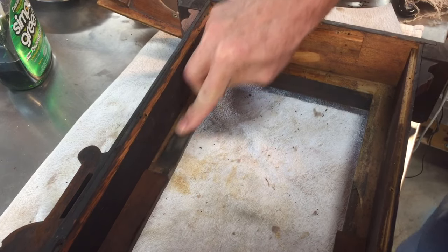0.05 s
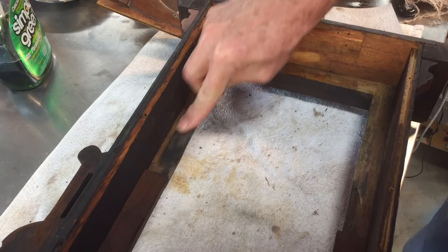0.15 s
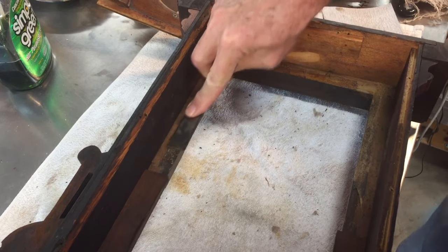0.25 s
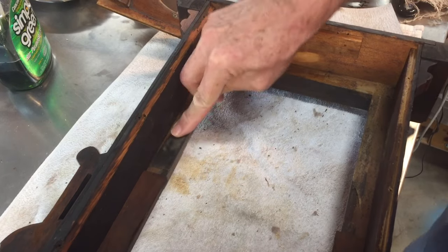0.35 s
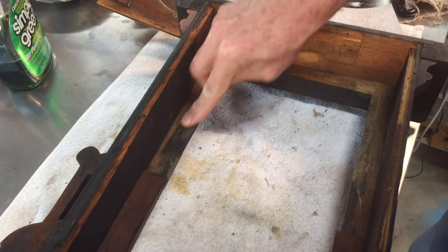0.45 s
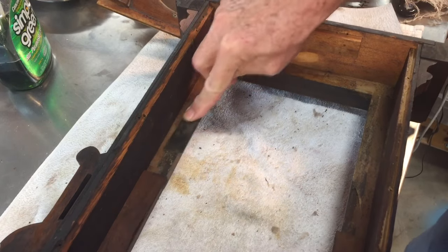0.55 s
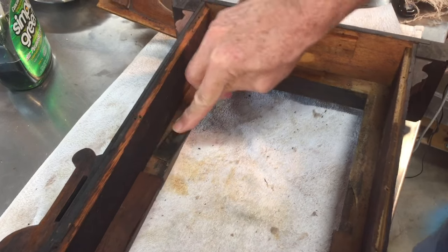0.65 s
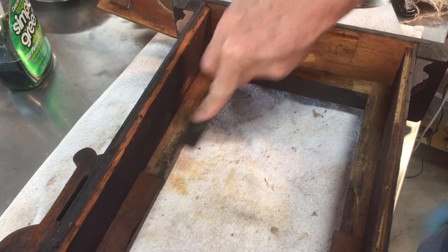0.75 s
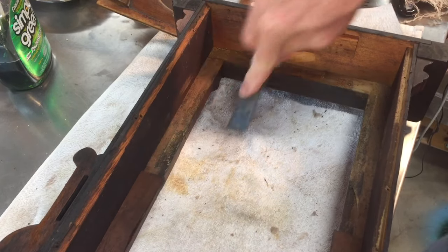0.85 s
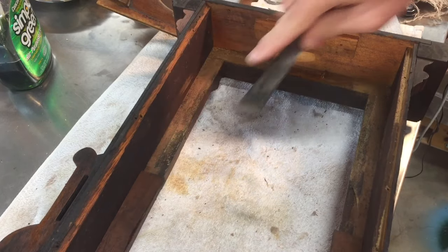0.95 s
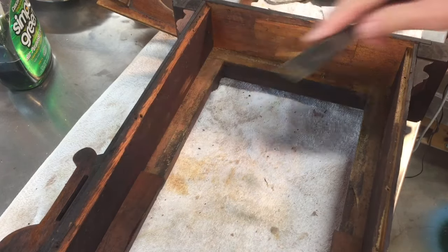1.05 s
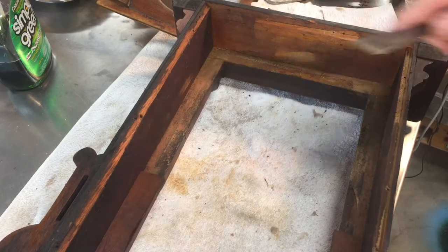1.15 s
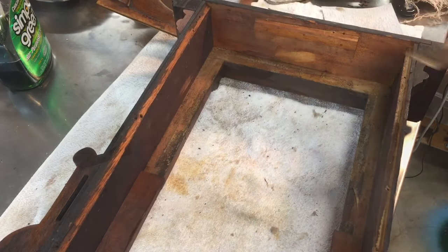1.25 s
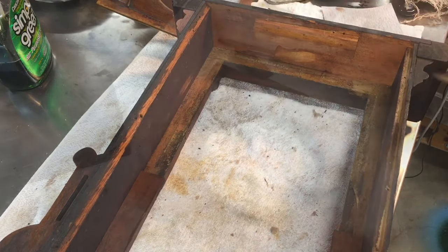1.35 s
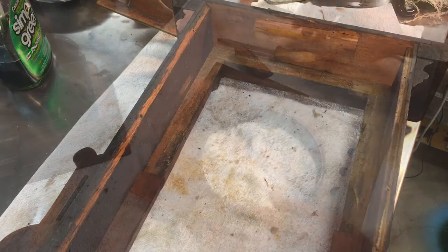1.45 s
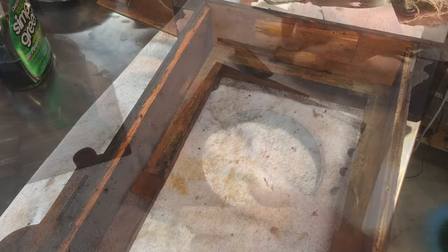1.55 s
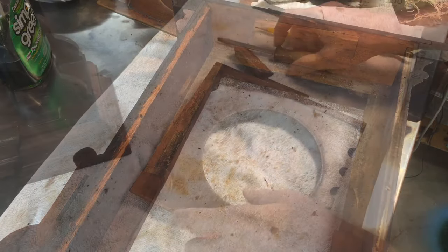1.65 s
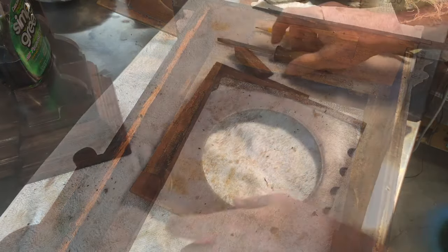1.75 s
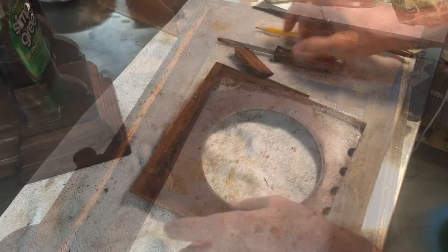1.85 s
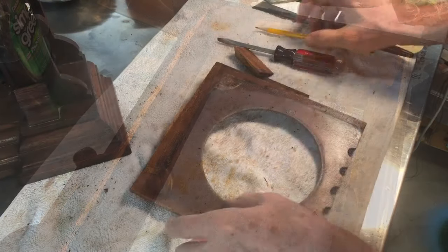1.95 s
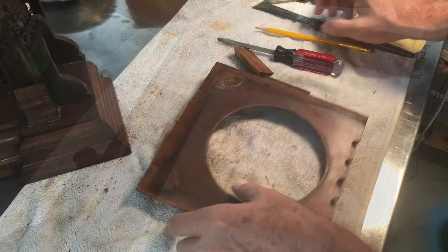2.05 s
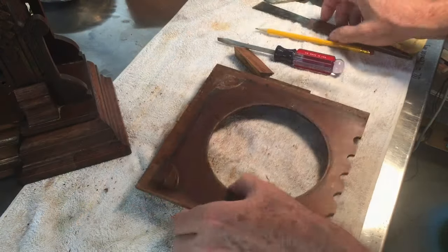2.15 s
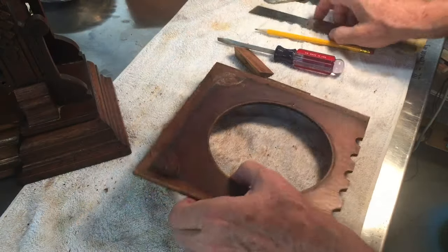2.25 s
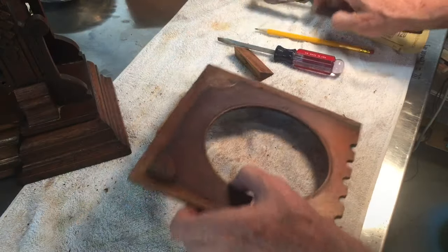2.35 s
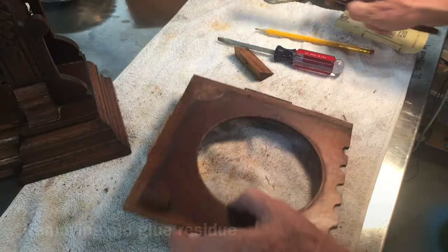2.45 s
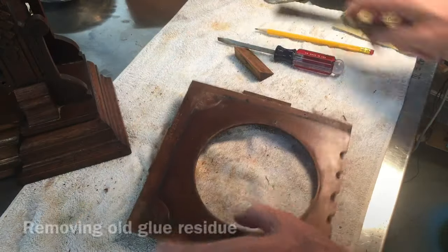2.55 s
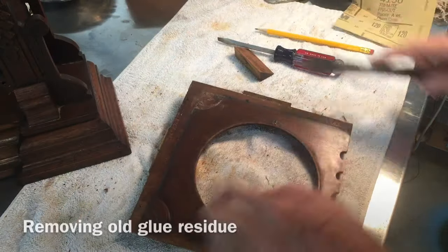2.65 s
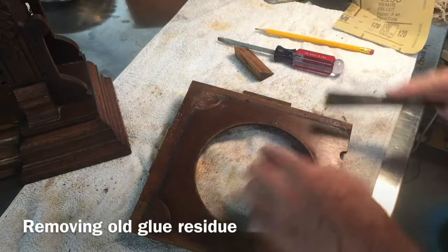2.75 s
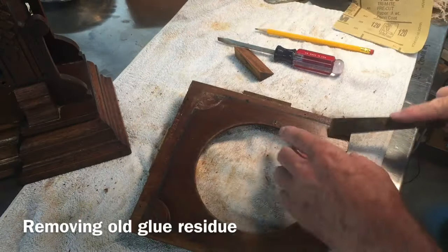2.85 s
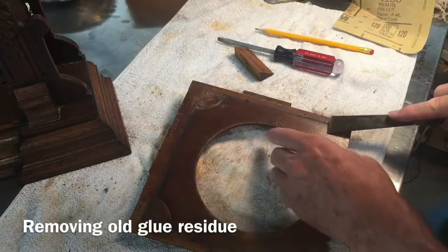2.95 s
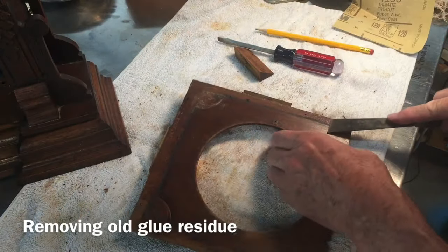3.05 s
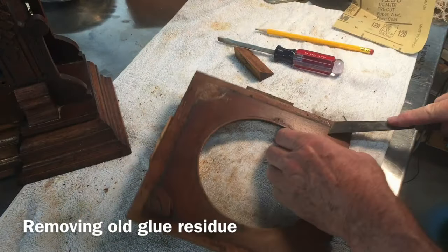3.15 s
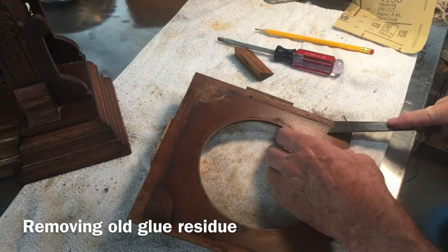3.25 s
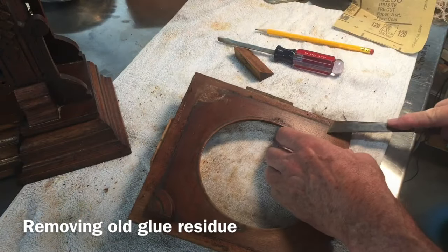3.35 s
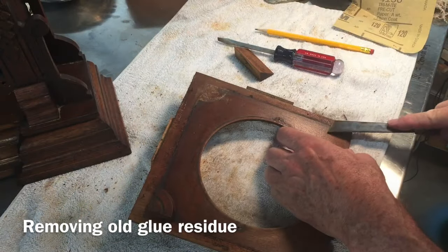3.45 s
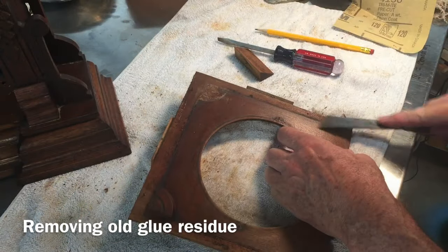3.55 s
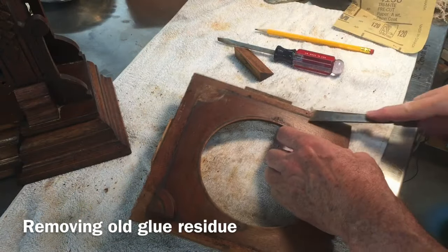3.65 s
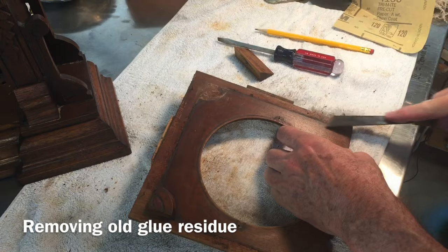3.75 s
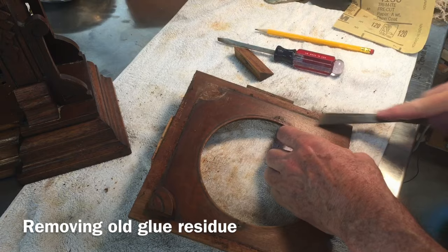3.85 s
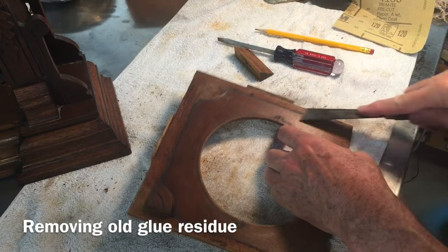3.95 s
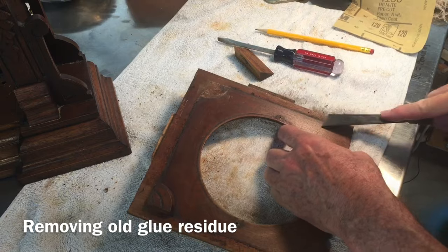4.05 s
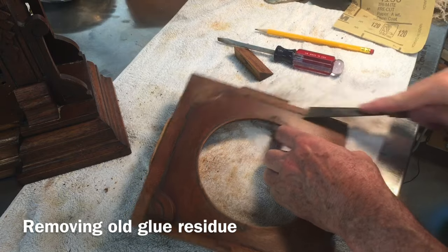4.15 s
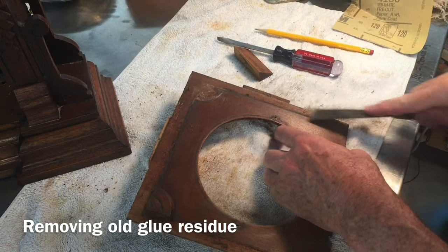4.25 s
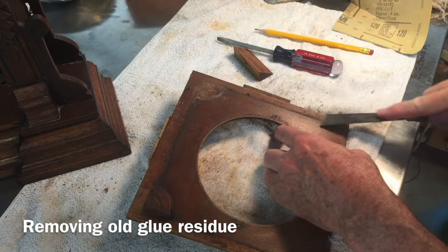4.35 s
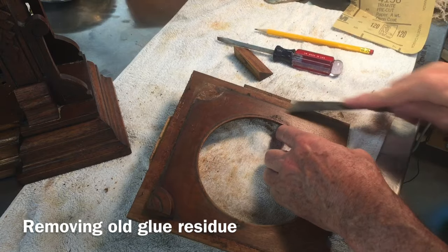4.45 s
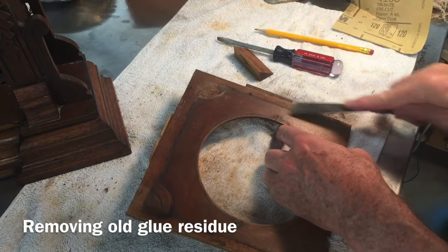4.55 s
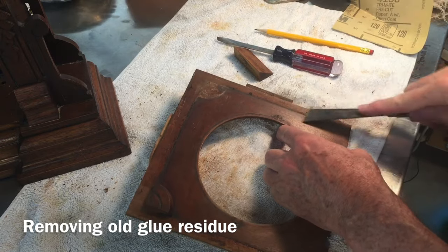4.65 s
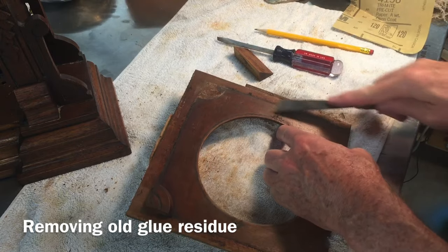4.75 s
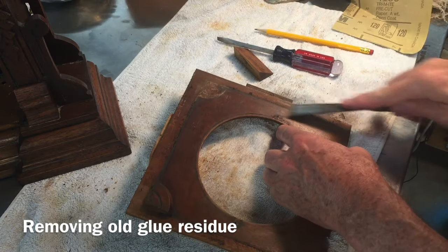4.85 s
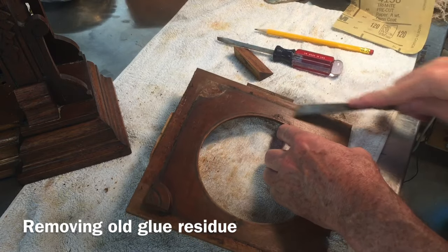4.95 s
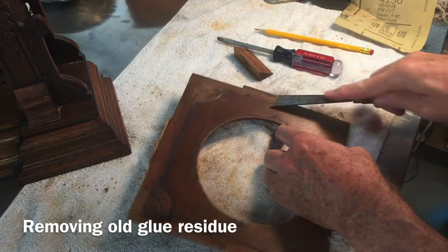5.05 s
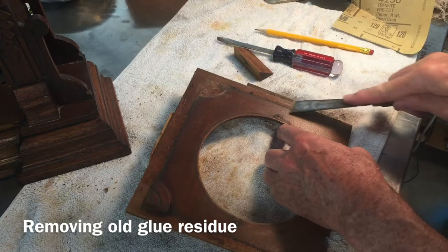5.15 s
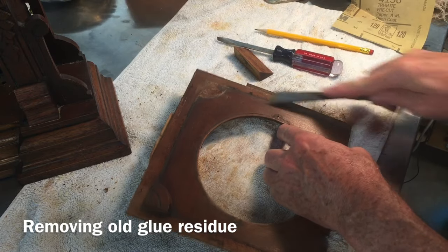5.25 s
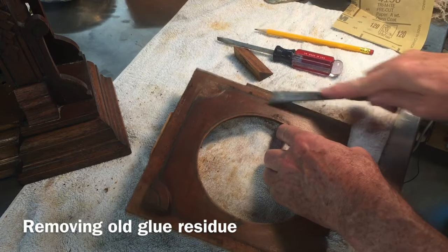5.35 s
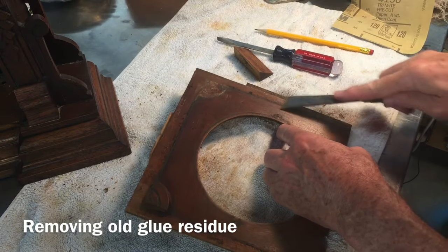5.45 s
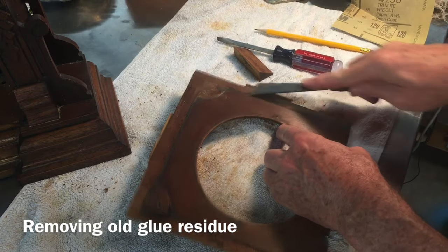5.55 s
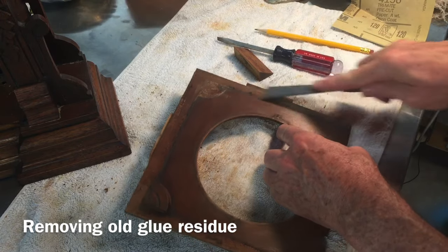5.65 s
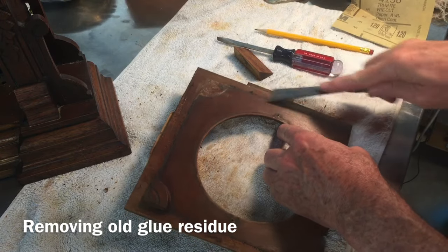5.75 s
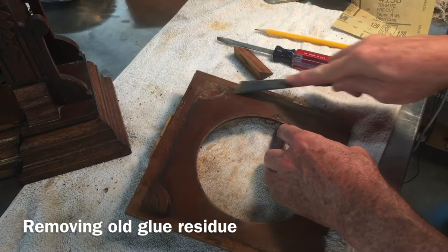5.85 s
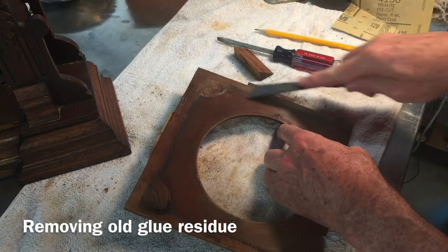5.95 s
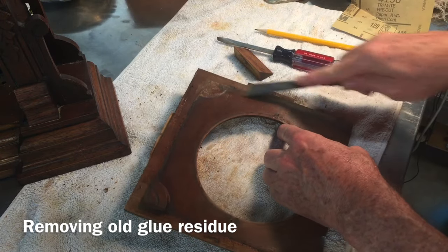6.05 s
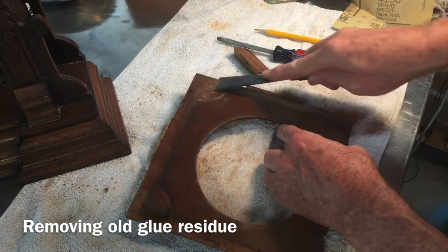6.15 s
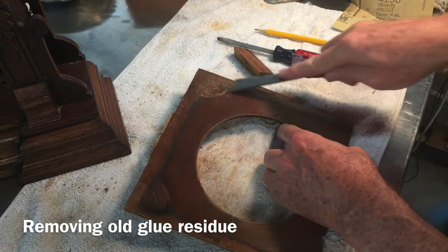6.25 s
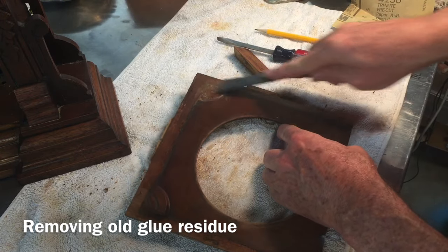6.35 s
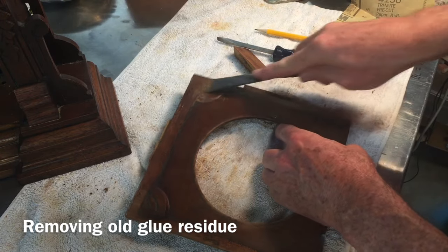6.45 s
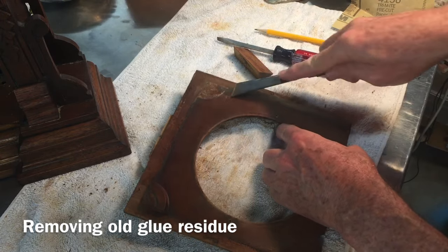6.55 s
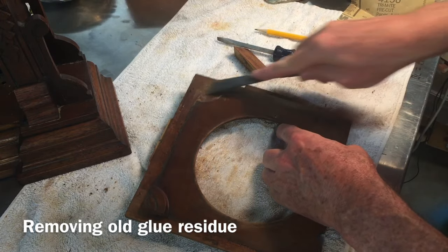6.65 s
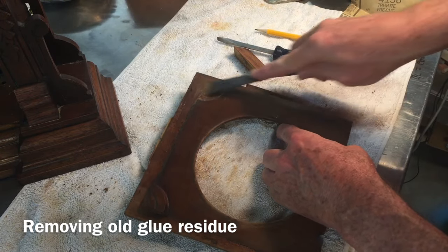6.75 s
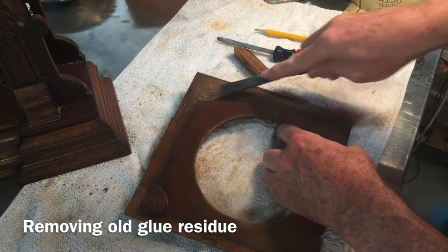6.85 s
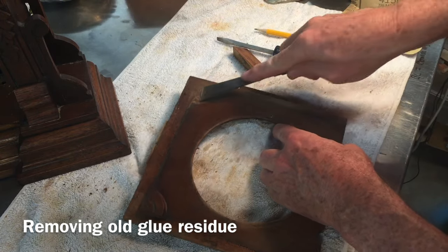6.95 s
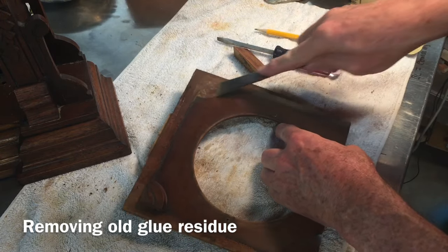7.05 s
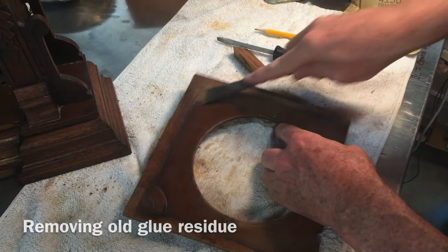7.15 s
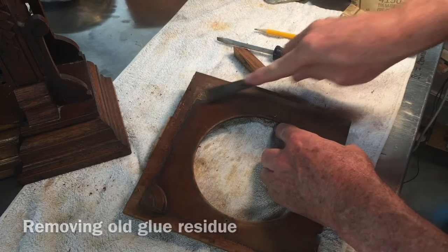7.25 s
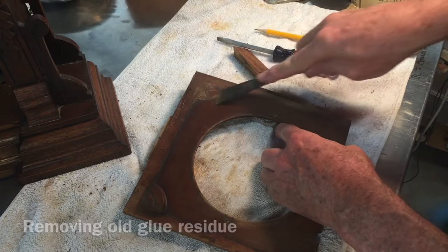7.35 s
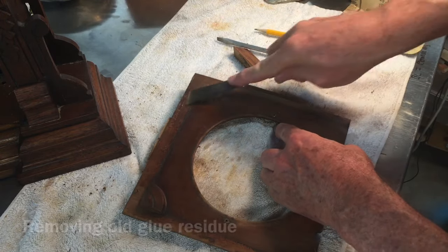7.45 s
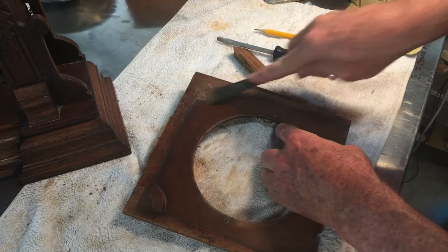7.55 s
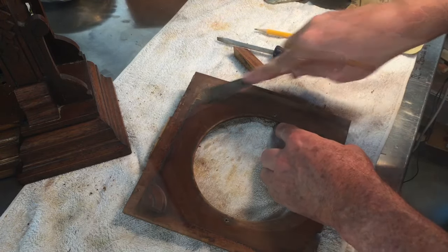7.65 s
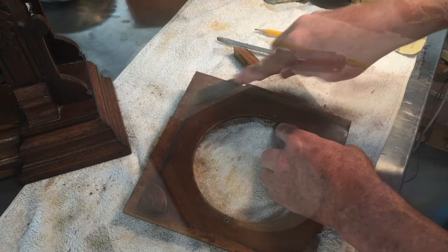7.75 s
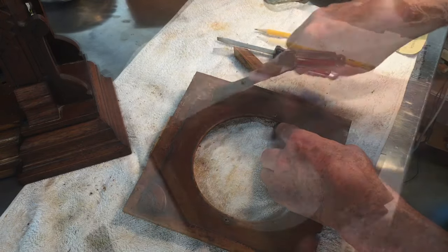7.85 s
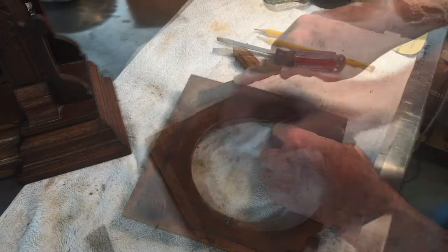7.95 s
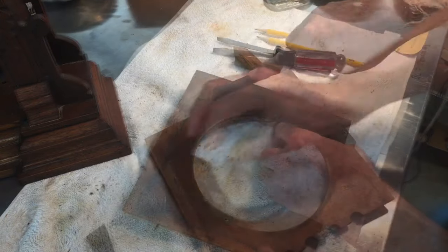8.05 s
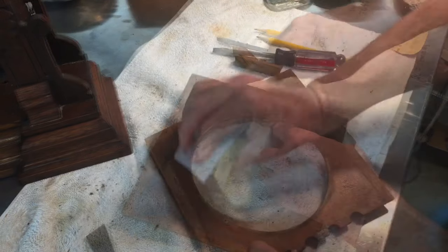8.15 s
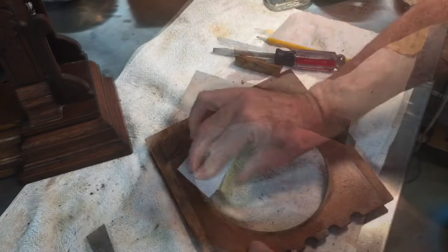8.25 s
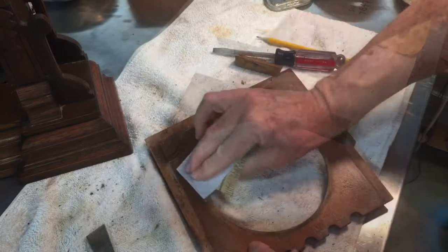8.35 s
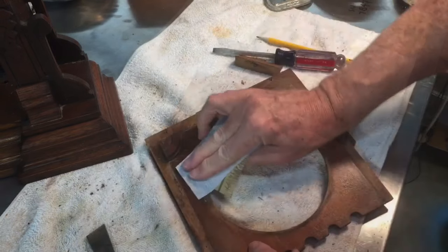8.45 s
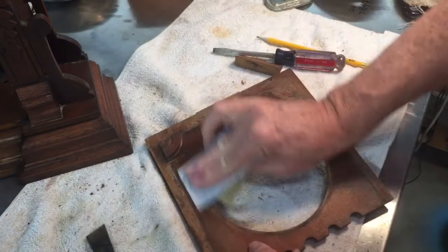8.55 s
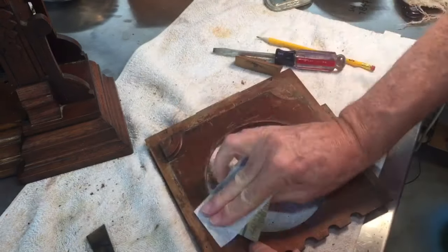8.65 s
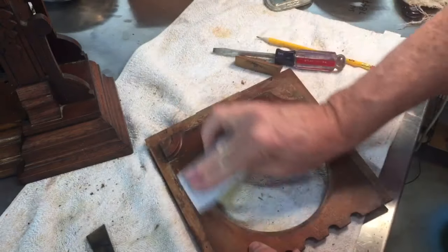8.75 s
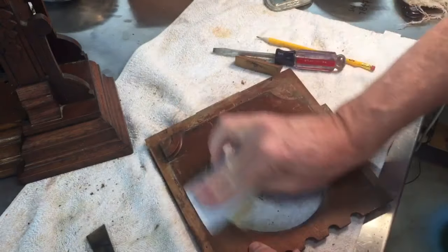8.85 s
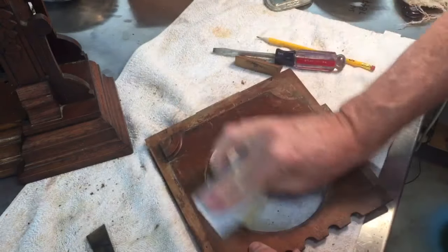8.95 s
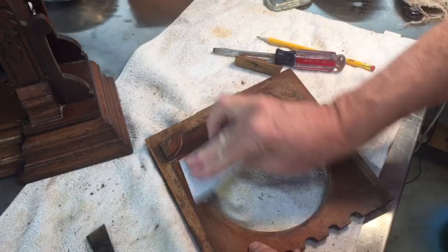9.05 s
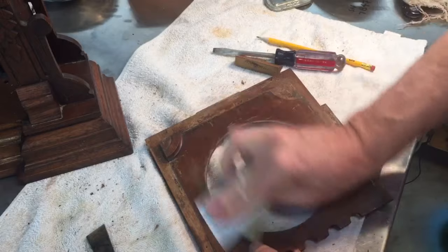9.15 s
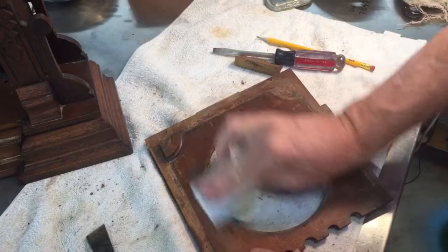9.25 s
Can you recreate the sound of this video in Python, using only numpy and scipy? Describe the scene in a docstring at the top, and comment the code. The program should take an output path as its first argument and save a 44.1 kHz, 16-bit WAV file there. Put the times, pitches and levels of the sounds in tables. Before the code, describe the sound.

Quiet workshop heard by one close microphone: low soft ventilation air, a very faint hum, slight short room echo. From 0 to 0.9 s a flat steel blade scrapes old glue from a wooden case in quick dry strokes, about eight a second at first, ending with a catch and a woody tap. A near-quiet pause follows with faint touches and brushing; a dull bench thump at 2.6 s and a bright steel-on-wood clack at 2.9 s. From 3.55 s rapid scraping works a thin panel, raspy and uneven, brittle cracks and tiny flakes pattering. From about 5.9 s it grows harder and cracklier, and from 6.4 s the panel rocks with soft low knocks. Around 8 s scraping fades into rustling, crackling sandpaper; a small clack at 8.6 s, then six fast, smooth, bright hissing sanding strokes until about 9.4 s.

```python
"""A quiet workshop, one close microphone: a flat steel blade scrapes brittle old glue off a wooden case,
then off a thin wooden panel, in quick strokes; sandpaper is handled, then takes over in fast even strokes.
Scraping, sanding and brushing are friction: random tiny fractures, shaped by hand speed, excite filters.
Rocking wood, bench thumps, touches and steel clacks are struck bodies: sums of decaying sine modes.
Shaped noise makes the air, a wavering sine the hum, and decaying noise the echo of the room."""
import sys
import numpy as np
from scipy import signal
from scipy.fft import rfft, irfft
from scipy.io import wavfile
from scipy.ndimage import map_coordinates

SR = 44100
rng = np.random.default_rng(int(sys.argv[2]) if len(sys.argv) > 2 else 0)


def to_wav(sig):
    """Store sig (one row per channel, or 1-D mono) as 16-bit WAV at the path in sys.argv[1].

    Samples outside -1..1 are clipped; the rate is SR.
    """
    pcm = np.clip(np.atleast_2d(sig), -1, 1) * 32767
    pcm = np.round(pcm).astype(np.int16)
    wavfile.write(sys.argv[1], SR, pcm.T)  # frames by channels


N = 410571  # samples
FFT_SIZE = 4096
HZ = np.fft.rfftfreq(FFT_SIZE, 1 / SR)


def amp(db):
    """Level law: decibels to amplitude gain."""
    return 10 ** (np.asarray(db) / 20)


def unit(x):
    """Normalization: scales a signal to rms 1."""
    return x / np.sqrt(np.mean(x ** 2) + 1e-20)


def read(points, hz):
    """Spectral interpolation: reads a table along a log-frequency axis."""
    table_hz, value = np.transpose(points)
    return np.interp(np.log(hz + 1), np.log(table_hz + 1), value)


def add(mix, s, sound):
    """Superposition: adds a sound at time s, dropping what lies outside the mix."""
    at = round(s * SR)
    sound = sound[max(-at, 0):]
    part = mix[max(at, 0):][:len(sound)]
    part += sound[:len(part)]


def wander(size, span):
    """Smoothed random process: rms about 1, changing over about span steps."""
    window = signal.windows.hann(max(int(span), 1) * 2 + 1)
    noise = rng.standard_normal(size + len(window) - 1)
    return signal.fftconvolve(noise, window, "valid") / np.linalg.norm(window)


def response(db):
    """Minimum phase: a causal impulse response of energy 1 follows from the spectrum alone."""
    log_gain = np.log(amp(np.maximum(db - db.max(), -100)))
    circle = np.concatenate([log_gain, log_gain[-2:0:-1]])
    # the Hilbert transform of the log gain gives the phase
    spectrum = np.exp(np.conj(signal.hilbert(circle)))
    taps = np.fft.ifft(spectrum).real[:FFT_SIZE // 2]
    return taps / np.linalg.norm(taps)


def speed_of(start, fastest, end, peakedness):
    """Stroke kinematics: speed rises and falls once as a power of a skewed half sine."""
    t = np.arange(start, end, 1 / SR)
    phase = np.interp(t, [start, fastest, end], [0, .5, 1])
    return np.sin(np.pi * phase).clip(0) ** peakedness


def grit(speed, per_s, spread_db, clump_db, clump_s):
    """Microfracture: uneven impulses, more of them at speed (per_s at speed 1), swelling in clumps."""
    size = len(speed)
    breaks = rng.random(size) < per_s / SR * (.6 + .4 * speed)
    excess = np.minimum(rng.exponential(1, size), 3)
    sizes = amp(spread_db * excess) * rng.choice([-1, 1], size)
    clumps = amp(clump_db * np.tanh(wander(size, clump_s * SR)))
    return unit(breaks * sizes * clumps)


def knocks(blows, modes, upper_hz, contact_s, rattle, rattle_s, detune):
    """Modal synthesis: each blow rings decaying sines, upper_db sets those above upper_hz, contact chatters."""
    out = np.zeros(N)
    t = np.arange(SR // 2) / SR
    for s, level_db, upper_db in blows:
        ring = np.zeros(len(t))
        for k, (hz, db, t60) in enumerate(modes):
            fall = amp(db + upper_db * (hz > upper_hz) - 60 * t / t60)
            pitch_hz = hz * rng.normal(1, detune)
            ring += (-1) ** k * fall * np.sin(2 * np.pi * pitch_hz * t)
        ring *= 1 - np.exp(-t / contact_s)  # the contact softens the onset
        chatter = rattle * rng.standard_normal(len(t)) * np.exp(-t / rattle_s)
        chatter[0] = 1
        chatter /= np.linalg.norm(chatter)
        add(out, s, amp(level_db) * signal.fftconvolve(ring, chatter))
    return out


# spectral shape of the workshop air: pitch_hz [Hz], level_db [dB per Hz, relative]
AIR = [(15, -70), (28, -44), (42, -11.5), (60, -5.5), (104, -3.5), (180, -13), (371, -14), (620, -20),
       (955, -21), (1400, -22.5), (2400, -24.5), (4200, -28.5), (9000, -33.5), (15800, -39.5)]
# level of the workshop air over time: time_s [s], level_db [dB]
AIR_LEVEL = [(0, -66), (1.1, -67.5), (1.65, -70.5), (2.45, -66), (3.5, -67.5), (5.2, -65), (7.0, -64.5),
             (8.05, -68), (8.6, -64)]
HUM_HZ, HUM_DB = 59.3, -76.5


def air():
    """Broadband flow noise: ventilation of slowly changing level, plus a faint phase-wavering hum."""
    t = np.arange(N) / SR
    spectrum = rfft(rng.standard_normal(N)) * amp(read(AIR, np.fft.rfftfreq(N, 1 / SR)))
    noise = unit(irfft(spectrum, N))
    level_db = np.interp(t, *np.transpose(AIR_LEVEL))
    hum = np.sqrt(2) * np.sin(2 * np.pi * HUM_HZ * t + .5 * wander(N, SR / 4))
    return noise * amp(level_db) + amp(HUM_DB) * hum


# reverberation of the room: pitch_hz [Hz], t60_s [s]
ROOM = [(100, 0.66), (500, 0.63), (1000, 0.33), (2000, 0.19), (6000, 0.3), (15000, 0.17)]


def room(x, delay_s=.006, absorb_hz=4500):
    """Diffuse reverberation: dense reflections decay at a rate set by frequency, with the treble softened."""
    hz, t, z = signal.stft(rng.standard_normal(SR // 2), SR, nperseg=256)
    fall = amp(-60 * t / read(ROOM, hz)[:, None])
    tail = signal.istft(z * fall, SR, nperseg=256)[1]
    tail = np.concatenate([np.zeros(int(delay_s * SR)), tail / np.linalg.norm(tail)])
    absorption = signal.butter(2, absorb_hz, fs=SR, output="sos")
    return signal.sosfilt(absorption, signal.fftconvolve(x, tail)[:N])


# soft brushing of hands and blade, then sandpaper being handled (from 8.2 s):
# start_s [s], length_s [s], level_db [dB]
RUSTLES = [(2.17, 0.28, -70.5), (2.58, 0.037, -64), (2.633, 0.075, -62), (2.922, 0.067, -66),
           (3.061, .27, -76), (3.54, 0.041, -53), (5.355, 0.05, -62.5), (6.992, 0.11, -70.5),
           (8.22, .17, -57.5), (8.462, 0.27, -65)]
# spectral shape of the brushing: pitch_hz [Hz], level_db [dB per Hz, relative]
CLOTH = [(100, -11), (400, -7), (900, 3.5), (2400, 6), (4000, -5), (8000, -10), (15000, -25)]
RUSTLE_RISE = .3  # share of a brush spent speeding up


def rustling():
    """Soft friction: sparse, strongly clumped catches and slips excite one broad, soft colour."""
    out = np.zeros(N)
    for start, length, db in RUSTLES:
        speed = speed_of(start, start + RUSTLE_RISE * length, start + length, peakedness=0.53)
        force = speed * grit(speed, per_s=2900, spread_db=4.5, clump_db=7, clump_s=0.0056)
        add(out, start, amp(db) * signal.fftconvolve(force, response(read(CLOTH, HZ))))
    return out


# wood is touched or set down: start_s [s], level_db [dB], upper_db [dB, upper modes]
TAPS = [(.868, -38, -15), (.881, -41, -14), (1.003, -59.5, 3.5), (1.389, -55.5, 4.5), (1.948, -64, 3),
        (2.327, -62.5, 3), (2.814, -62.5, 5), (3.192, -62, -3)]
# modes of the touched wood: pitch_hz [Hz, before detuning], level_db [dB], t60_s [s]
TAP_MODES = [(330, -7.5, 0.089), (778, -5.5, 0.088), (956, 5.5, 0.036), (1306, -6, 0.055), (2100, -10, .02),
             (2794, 0, 0.029), (3550, -9, 0.056), (5470, -8.5, .02)]


def taps_on_wood():
    """Impact on a small body: short modes with a strong brief chatter."""
    return knocks(TAPS, TAP_MODES, upper_hz=1100, contact_s=0.00061,
                  rattle=0.35, rattle_s=0.0052, detune=0.047)


# a hand lands on the bench: start_s [s], level_db [dB], upper_db [dB, upper modes]
THUMPS = [(2.64, -36, 1), (2.652, -43, 12), (3.24, -61, -2)]
# modes of the bench: pitch_hz [Hz, before detuning], level_db [dB], t60_s [s]
BENCH_MODES = [(66.2, -19, 0.89), (103, 2.5, 0.077), (130, 4.5, 0.085), (210.6, -8, 0.39),
               (239, -0.5, 0.092), (346, -9.5, 0.13), (380, -10.5, 0.13), (570, -12.5, 0.047)]


def thumps():
    """Impact on a heavy body: the bench rings in low modes."""
    return knocks(THUMPS, BENCH_MODES, upper_hz=300, contact_s=0.0014,
                  rattle=0.0094, rattle_s=0.051, detune=0.0052)


# steel meets wood with a small bounce: start_s [s], level_db [dB], upper_db [dB, upper modes]
CLACKS = [(1.732, -60.5, 8), (1.854, -63, 6), (2.2, -68, 14), (2.59, -65, 9), (2.9243, -38, -7),
          (2.9266, -33, 1.5), (2.9323, -47, 4.5), (8.603, -39.5, 5.5)]
# modes of steel and wood: pitch_hz [Hz, before detuning], level_db [dB], t60_s [s]
CLACK_MODES = [(345, -26.5, 0.11), (1164, -12.5, 0.069), (1400, -9, 0.017), (1716, -2, 0.028),
               (2000, -0.5, 0.02), (2440, -7.5, 0.019), (2580, -6.5, 0.029), (2890, -12, 0.023),
               (3380, -8.5, .018), (3700, -14.5, 0.017), (4530, -23.5, 0.044), (5470, -18, 0.016),
               (6060, -18, .016)]


def clacks():
    """Hard impact: a very short contact leaves the high modes sharp."""
    return knocks(CLACKS, CLACK_MODES, upper_hz=2100, contact_s=0.00022,
                  rattle=0.1, rattle_s=0.0024, detune=0.0028)


# each row of STROKES ends in a soft jolt just before it stops; level is against the stroke's body
JOLT_LEAD_S, JOLT_DB, JOLT_UPPER_DB = .025, -29.5, 16.5


def jolts():
    """Momentum transfer: the wood takes a blow as each row brakes (start_s, level_db, upper_db)."""
    blows = []
    for start, fastest, end, db in STROKES:
        body_db = colour_of(fastest, db)[0]
        blows.append((end - JOLT_LEAD_S, db + body_db + JOLT_DB, JOLT_UPPER_DB))
    return blows


# the wood tips and drops back on its towel: start_s [s], level_db [dB], upper_db [dB, upper modes]
ROCKS = [(.35, -53, -2), (.672, -62, 14), (.858, -48, -4), (.884, -58, 8), (4.2, -60.5, 17),
         (4.845, -63, 21), (6.458, -46, -10), (6.728, -42, 1), (6.955, -49.5, 6), (7.238, -37.5, -4),
         (7.488, -37, 0), (7.745, -40, 1.5), (7.952, -45.5, -1), (8.218, -55, 13.5)]
# modes of the rocking wood: pitch_hz [Hz, before detuning], level_db [dB], t60_s [s]
ROCK_MODES = [(89, -14, 0.11), (117.2, -1, .15), (189, -6, 0.089), (240, -15, .07), (334, -7.5, 0.094),
              (404.4, -14, 0.19), (469.5, -5, 0.12), (643, -6.5, 0.094)]


def rocking():
    """Cushioned impact: a slow contact softens the onset of the ringing wood, for both rocks and jolts."""
    return knocks([*ROCKS, *jolts()], ROCK_MODES, upper_hz=250, contact_s=0.0058,
                  rattle=0.044, rattle_s=0.0081, detune=0.03)


# the sanding hand turns round and sets off again: start_s [s], level_db [dB]
SANDING = [(8.627, -38.5), (8.776, -38), (8.895, -38), (9.027, -36.5), (9.143, -36.5), (9.261, -38.5)]
# sandpaper on the panel: pitch_hz [Hz], level_db [dB per Hz, relative]
PAPER = [(350, -55), (600, -25), (717, -31), (789, -17), (1070, -1.5), (1360, -4), (1870, 0.5),
         (2490, -0.5), (3020, 0.5), (5290, -0.5), (5820, -2), (9650, -1.5), (15800, -14)]
# the panel shudders under the sanding hand: pitch_hz [Hz], level_db [dB per Hz, relative]
SHUDDER = [(20, -37), (40, -5), (62, 12), (110, -10), (200, -14), (400, -8), (700, -24), (1200, -45)]
# a stroke lasts until the next turn: length of the last one, overlap at the turn, share spent speeding up
SAND_STROKE_S, SAND_OVERLAP_S, SAND_RISE = 0.14, .003, 0.52


def sanding(ripple_db=2.0, ripple_hz=70, shudder_db=-28, pressure=1.35, peakedness=1.82):
    """Abrasion: many grains cut at once, an almost smooth hiss that levels off at speed."""
    out = np.zeros(N)
    next_turns = [s for s, db in SANDING[1:]] + [SANDING[-1][0] + SAND_STROKE_S]
    for (turn, db), next_turn in zip(SANDING, next_turns):
        start, end = turn - SAND_OVERLAP_S, next_turn + SAND_OVERLAP_S
        fastest = start + SAND_RISE * (end - start)
        speed = speed_of(start, fastest, end, peakedness)
        speed = np.tanh(pressure * speed) / np.tanh(pressure)
        force = speed * grit(speed, per_s=22000, spread_db=2.0, clump_db=1.7, clump_s=0.0024)
        ripple = ripple_db * wander(len(HZ), ripple_hz / HZ[1])
        panel = response(read(PAPER, HZ) + ripple)
        shudder = amp(shudder_db) * response(read(SHUDDER, HZ))
        add(out, start, amp(db) * signal.fftconvolve(force, panel + shudder))
    return out


# what blade and wood ring with where the edge bites: pitch_hz [Hz, before shifting], width_hz [Hz], level_db [dB]
CASE_RAIL = [(308, 27, -7.5), (420, 45, -10), (890, 200, -13.5), (1186, 96, -2), (1470, 180, -6.5),
             (2154, 270, -5), (3080, 620, -12), (3770, 114, -7.5), (4880, 430, -12), (6530, 440, -19.5),
             (8080, 1400, -25), (11790, 2190, -36)]
CASE_CORNER = [(300, 67, -2), (934, 76, -2), (1300, 140, 1), (2060, 56, 2.5), (2290, 280, -2.5),
               (2900, 90, -24), (3470, 620, -23), (4340, 210, -20), (5000, 810, -21.5), (7100, 1000, -21.5),
               (9850, 290, -30), (13010, 2000, -33)]
PANEL_END = [(324, 32, 0.5), (477, 52, -4), (618, 13, -4.5), (850, 38, -4), (1267, 180, -4.5),
             (1490, 140, -1.5), (1730, 240, -2.5), (2403, 170, 1.5), (2860, 360, -4), (3760, 760, -6),
             (5540, 2000, -11), (9050, 460, -20.5), (11500, 3900, -26.5)]
PANEL_EDGE = [(395, 86, -9.5), (601, 25, -9.5), (913, 31, -4.5), (1220, 94, -8.5), (1705, 170, -4.5),
              (2440, 360, -5.5), (2920, 290, -0.5), (4050, 680, -7), (6740, 1150, -15), (8740, 1150, -17.5),
              (11600, 810, -20.5), (15300, 2450, -29)]
PANEL_MIDDLE = [(328, 84, -24), (468, 28, -12), (634, 50, -15), (1377, 143, -2.5), (1633, 180, -3),
                (2230, 300, -7.5), (3035, 305, -4.5), (3890, 340, -7.5), (4600, 1300, -17.5),
                (6480, 270, -16), (8310, 1220, -20.5), (11770, 1000, -32), (14700, 1000, -35)]
PANEL_CORNER = [(323, 24, -8.5), (470, 124, -12), (770, 200, -17.5), (1100, 103, -9.5), (1350, 146, -6),
                (1820, 139, 2.5), (2290, 190, -6.5), (2905, 250, -3), (3880, 610, -8), (4820, 540, -10.5),
                (6800, 660, -17.5), (8150, 560, -19), (11400, 2200, -26.5)]
# colour of the place worked; a row is overridden by any later-listed row already begun:
# since_s [s], resonances [one of the tables above], body_db [dB], bite_db [dB], fizz_db [dB]
SPOTS = [(-1, CASE_RAIL, 3, -1, -5), (.73, CASE_CORNER, -5, 10.5, -1), (3, PANEL_END, 2.5, -4, -2.5),
         (4.57, PANEL_EDGE, 3, 2, 6.5), (4.5, PANEL_EDGE, 4.5, -2, -1.5),
         (5.5, PANEL_MIDDLE, 3, -2.5, -4.5), (6, PANEL_MIDDLE, -4, -2.5, -4.5),
         (7, PANEL_CORNER, -0.5, -1, 0), (7.5, PANEL_CORNER, 3, 1.5, 5.5)]


def spot_at(s):
    """Position dependence: resonances, body, bite and fizz of the place worked at time s."""
    return [spot for since, *spot in SPOTS if since <= s][-1]


# bite (3-5 kHz) and fizz (above 7 kHz) gained per dB of stroke level over an ordinary stroke
ORDINARY_DB, BITE_PER_DB, FIZZ_PER_DB = -40, 0.21, .6


def colour_of(s, db):
    """Pressure brightening: body, bite and fizz of the place, brighter the harder the stroke is pressed."""
    modes, body_db, bite_db, fizz_db = spot_at(s)
    excess_db = db - ORDINARY_DB
    return body_db, bite_db + BITE_PER_DB * excess_db, fizz_db + FIZZ_PER_DB * excess_db


def wood(s, body_db, bite_db, fizz_db, ripple_db=4.5, ripple_hz=75, grip=0.026, damping_s=0.027):
    """Damped resonance: the modes of the spot shift with each new grip, and the hand damps them."""
    power = np.zeros(len(HZ))
    for hz, width, db in spot_at(s)[0]:
        offset = (HZ - hz * rng.normal(1, grip)) / width
        power += amp(db) ** 2 / (1 + offset ** 2) ** 2
    colour = read([(60, -12.5), (250, body_db), (650, body_db), (1000, 0.5), (2100, 0),
                   (3000, bite_db), (5000, bite_db), (7500, fizz_db)], HZ)
    ripple = ripple_db * np.tanh(wander(len(HZ), ripple_hz / HZ[1]))
    taps = response(10 * np.log10(power) + colour + ripple)
    taps = taps * np.exp(-np.arange(len(taps)) / (damping_s * SR))
    return taps / np.linalg.norm(taps)


# short cracks: glue giving way under the blade, and at the end crackles of handled sandpaper:
# start_s [s], level_db [dB, relative], fizz_db [dB]
SNAPS = [(.382, -35, -2), (.672, -43.5, -6), (.844, -34.5, 8.5), (.866, -42.5, -4), (3.578, -39.5, 4),
         (4.08, -35.5, 6), (4.202, -44, 9), (4.718, -48, 2), (5.869, -27, 6.5), (6.137, -31, 2),
         (6.153, -25, 6.5), (6.719, -31, -9), (6.729, -24, 0), (6.822, -32.5, -8.5), (6.953, -36, -13),
         (7.215, -35, -11), (7.236, -26, 1.5), (7.334, -36, -10), (7.484, -29, 5), (7.581, -31.5, -8),
         (7.74, -32, 1), (7.824, -34, -19), (8.181, -40, -12), (8.211, -32.5, 5.5), (8.224, -35.5, 3),
         (8.292, -42.5, 11.5), (8.414, -41.5, 3), (8.432, -36.5, -2)]
SNAP_T60_S = 0.035


def snaps(rise_s=.003, level_db=-0.5):
    """Sudden release: glue gives way, or paper crackles, in a short burst of cracks that builds and dies."""
    out = np.zeros(N)
    t = np.arange(SR // 8) / SR
    swell = np.minimum(t / rise_s, 1) * amp(-60 * np.maximum(t - rise_s, 0) / SNAP_T60_S)
    for s, db, fizz_db in SNAPS:
        cracks = grit(swell, per_s=11000, spread_db=2.2, clump_db=2, clump_s=.001)
        burst = unit(swell * cracks) * np.sqrt(np.mean(swell ** 2))
        body = wood(s, body_db=-1.5, bite_db=0.0, fizz_db=fizz_db)
        add(out, s, amp(db + level_db) * signal.fftconvolve(burst, body))
    return out


# friction grows as this power of the hand's speed, then levels off (higher = sooner)
SPEED_POWER, LEVELLING = 1.49, .9


def friction_of(start, fastest, end):
    """Saturating friction: the force through one stroke, 1 at its fastest."""
    speed = speed_of(start, fastest, end, SPEED_POWER)
    return np.tanh(LEVELLING * speed) / np.tanh(LEVELLING)


# brittle flakes cracking off and landing: pitch_hz [Hz], level_db [dB per Hz, relative]
FLAKES = [(500, -38), (2000, 6), (4000, -6), (8000, -1), (12500, -12), (15800, -13)]


def flakes(level_db=-26, linger_s=0.032, per_s=600):
    """Granular impacts: sparse clicks, as of glue flakes, grow with friction and patter on after each row."""
    out = np.zeros(N)
    t = np.arange(SR // 150) / SR
    keep = np.exp(-1 / (linger_s * SR))
    for start, fastest, end, db in STROKES:
        fizz_db = colour_of(fastest, db)[2]
        friction = np.pad(friction_of(start, fastest, end), (0, SR // 6))
        in_flight = signal.lfilter([1 - keep], [1, -keep], friction)
        click = rng.standard_normal(len(t)) * np.exp(-t / 0.0019)
        crack = signal.fftconvolve(click, response(read(FLAKES, HZ)))
        crack /= np.linalg.norm(crack)
        patter = in_flight * grit(in_flight, per_s=per_s, spread_db=8.5, clump_db=10.0, clump_s=0.0062)
        add(out, start, amp(db + level_db + fizz_db) * signal.fftconvolve(patter, crack))
    return out


def stick_slip(size, per_s=45, jitter=.7, load_db=2.5):
    """Stick-slip: load builds and collapses as the contact gives, at an uneven rate."""
    rate = per_s * np.exp(jitter * wander(size, SR / 100))
    load = (rng.random() + np.cumsum(rate) / SR) % 1
    return unit(amp(load_db * (2 * load - 1)))


def travel(force, direction, echo=0.35, delay_s=0.001099, glide=0.23):
    """Comb filtering: an echo from the end of the wood joins the force; its delay slides along the stroke."""
    at = np.arange(len(force))
    slide = np.exp(direction * glide * np.linspace(-1, 1, len(force)))
    delay = SR * delay_s * rng.uniform(0.78, 1.272) * slide  # samples
    echoed = map_coordinates(force, [at - delay], order=3)
    return (force + echo * echoed) / np.hypot(1, echo)


# scraping strokes to and fro, a catching stroke takes two rows; the last two rows are sandpaper being handled:
# start_s [s], fastest_s [s], end_s [s], level_db [dB, relative]
STROKES = [(-0.062, 0.002, 0.052, -35.5), (0.055, 0.131, 0.185, -38), (0.191, 0.265, 0.315, -40),
           (0.318, 0.39, 0.438, -39.5), (0.489, 0.533, 0.584, -45.1), (0.619, 0.654, 0.716, -49),
           (0.788, 0.85, 0.865, -36.5), (3.55, 3.642, 3.683, -36), (3.733, 3.812, 3.852, -44),
           (3.868, 3.945, 4.007, -35.5), (4.016, 4.091, 4.125, -41), (4.145, 4.172, 4.233, -39.5),
           (4.298, 4.333, 4.404, -52), (4.419, 4.483, 4.573, -38), (4.582, 4.631, 4.708, -48),
           (4.708, 4.782, 4.878, -40.7), (4.853, 4.921, 4.968, -48), (4.996, 5.053, 5.108, -43.8),
           (5.148, 5.192, 5.221, -62.5), (5.246, 5.307, 5.353, -42.5), (5.41, 5.447, 5.5, -54.9),
           (5.509, 5.592, 5.646, -37.5), (5.686, 5.705, 5.792, -42), (5.797, 5.858, 5.956, -36),
           (5.96, 6.007, 6.069, -38), (6.077, 6.111, 6.151, -40), (6.127, 6.149, 6.222, -33),
           (6.263, 6.297, 6.348, -40), (6.358, 6.42, 6.461, -35), (6.514, 6.581, 6.62, -37.7),
           (6.637, 6.694, 6.772, -33.6), (6.793, 6.816, 6.881, -41), (6.919, 6.946, 6.979, -41),
           (7.067, 7.096, 7.138, -49), (7.167, 7.218, 7.238, -42.5), (7.309, 7.323, 7.4, -43.5),
           (7.408, 7.49, 7.536, -36.0), (7.555, 7.57, 7.659, -41.5), (7.672, 7.729, 7.8, -42.1),
           (7.802, 7.822, 7.897, -43), (7.91, 7.96, 7.971, -44.5), (8.042, 8.064, 8.103, -53),
           (8.137, 8.181, 8.199, -47), (8.231, 8.277, 8.388, -52), (8.379, 8.4, 8.621, -52.5)]


def scraping(level_db=-0.11, slow_hz=3200, brightening=0.5, catch_db=2.5, catch_s=.005):
    """Dry friction: scraping, and last the handled paper; dull while slow, crisp at speed and in brief catches."""
    out = np.zeros(N)
    slow_filter = signal.butter(1, slow_hz, fs=SR, output="sos")
    for k, (start, fastest, end, db) in enumerate(STROKES):
        friction = friction_of(start, fastest, end)
        cracks = grit(friction, per_s=8500, spread_db=3.0, clump_db=2, clump_s=0.0024)
        # the echo's glide reverses from row to row
        force = travel(friction * cracks * stick_slip(len(friction)), (-1) ** k)
        catches = amp(catch_db * np.tanh(wander(len(force), catch_s * SR)))
        crisp = speed_of(start, fastest, end, brightening) * catches
        dull = signal.sosfiltfilt(slow_filter, force)
        contact = dull + crisp * (force - dull)
        body = wood(fastest, *colour_of(fastest, db))
        add(out, start, amp(db + level_db) * signal.fftconvolve(contact, body))
    return out


def scene():
    """Superposition: all the work at the bench, its echo and the air; one microphone feeds both channels."""
    work = scraping() + flakes() + snaps() + sanding() + rustling()
    work += rocking() + thumps() + taps_on_wood() + clacks()
    mono = work + amp(-18) * room(work) + air()
    return np.array([mono, mono])


EDGE_HZ = 15900


def record(dry):
    """Band limiting: a linear-phase low-pass removes what lies above the recorder's edge."""
    band = signal.firwin(511, EDGE_HZ, window=("kaiser", 9), fs=SR)
    return signal.oaconvolve(dry, band[None], "same")


dry = scene()
out = record(dry)
to_wav(out)
```